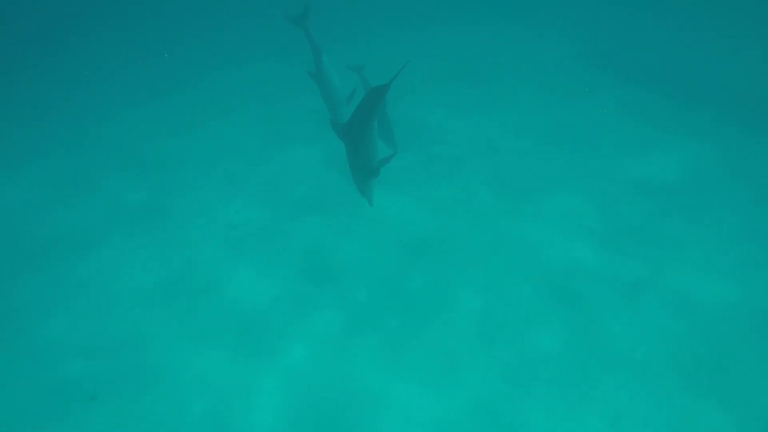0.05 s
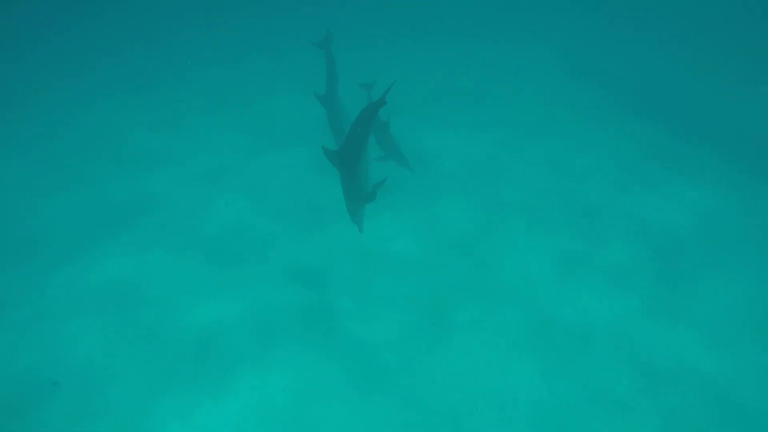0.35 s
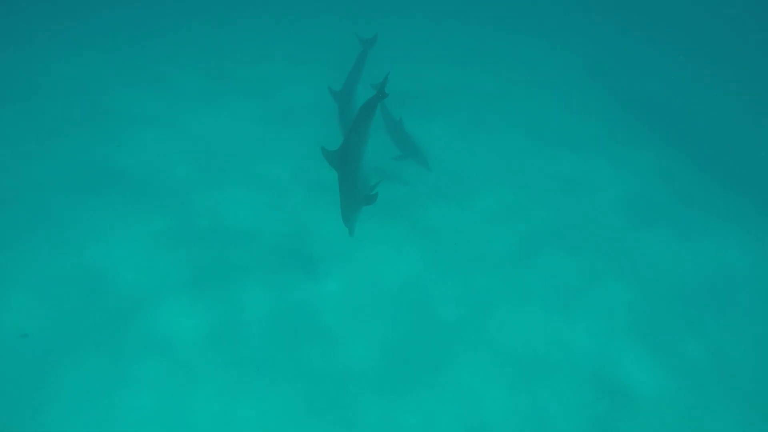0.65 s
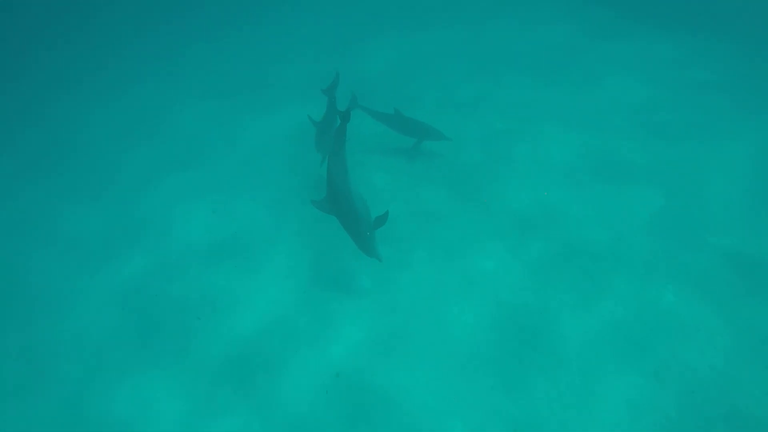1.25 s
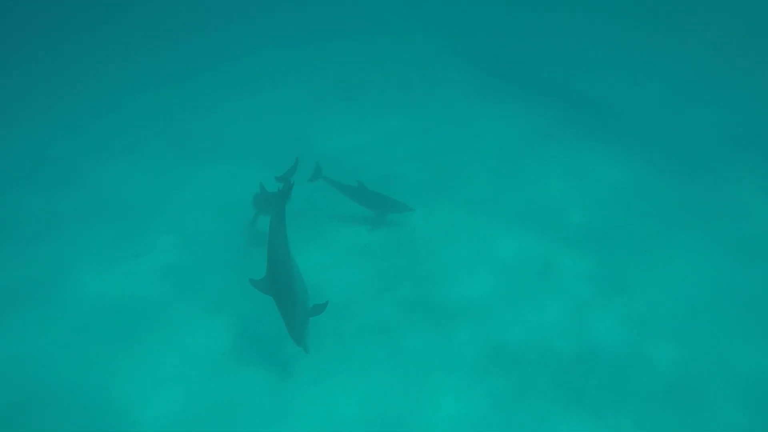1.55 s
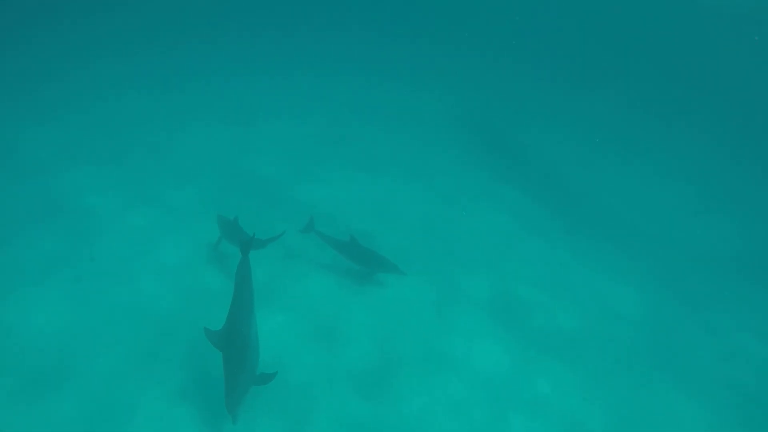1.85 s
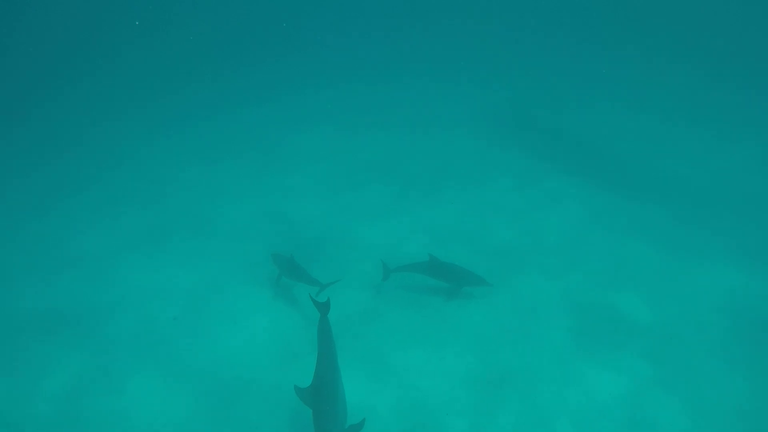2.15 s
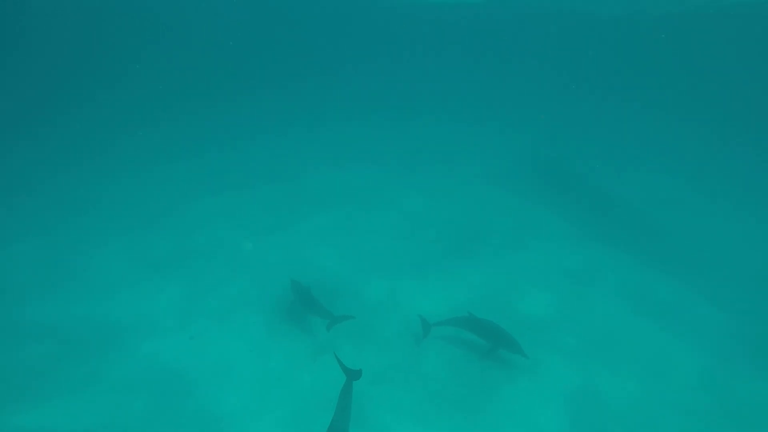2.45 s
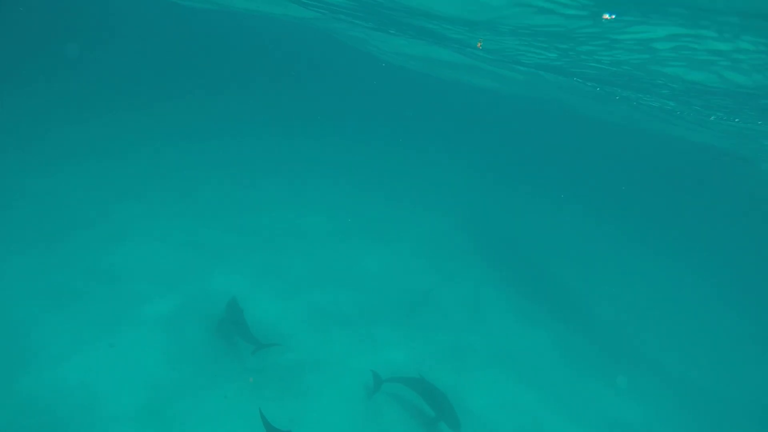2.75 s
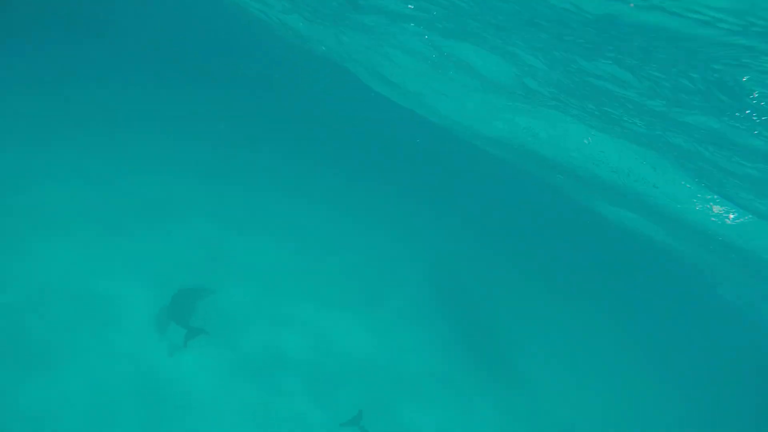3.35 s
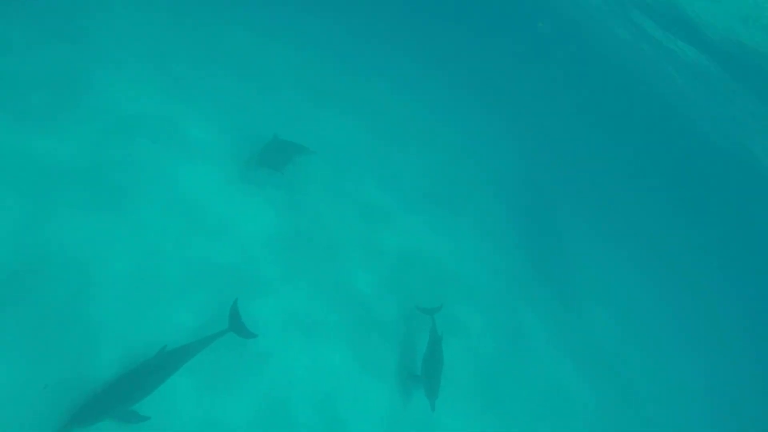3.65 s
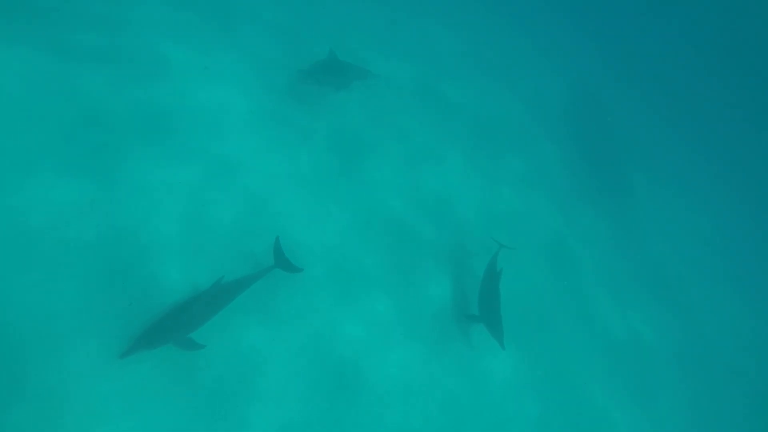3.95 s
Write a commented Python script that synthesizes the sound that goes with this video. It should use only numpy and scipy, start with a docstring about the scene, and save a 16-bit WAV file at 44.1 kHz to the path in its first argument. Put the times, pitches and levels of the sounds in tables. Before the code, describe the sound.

Thin, high dolphin whistles glide down and up over low water rumble, soft fizz and stray bubbles, heard from a submerged case. Late on, a short splash thumps close by, and the whistles continue, briefly quieter.

```python
"""Underwater over a sandy bottom, heard from inside a swimmer's watertight case. Water rumbles, gurgles and
fizzes from the start, and stray bubbles ring. From 0.3 s dolphins whistle, with brief sonar clicks: each
whistle dives, lingers and sweeps up again. At 3.2 s a splash near the surface rings with short tones, overloads
the recorder and ducks its gain, which creeps back under the last two whistles."""
import sys
import numpy as np
from scipy import signal
from scipy.fft import rfft, irfft
from scipy.io import wavfile
from scipy.ndimage import uniform_filter1d

SR = 44100
rng = np.random.default_rng(int(sys.argv[2]) if len(sys.argv) > 2 else 0)


def file_out(sig):
    """Save sig as 16-bit WAV at sys.argv[1]."""
    # one column per channel
    cols = np.atleast_2d(sig).T
    # limit, then scale
    lim = np.clip(cols, -1, 1)
    pcm = np.round(lim * 32767).astype(np.int16)
    wavfile.write(sys.argv[1], SR, pcm)


N = 176400
SAG = .08  # share by which the pitch drops across one throb or squeak


def whistle(contour):
    """A gliding near-sine with a weak octave, hoarse at its low turn, coloured by the case."""
    # How the case passes sound. Each row: frequency in Hz, gain in dB.
    case = [(7200, 4), (8400, -8.5), (9600, 7), (10500, 3.5), (11600, -1), (13300, 2.5), (15500, -14)]
    at, pitch, db = np.transpose(contour)
    t = np.arange(at[0], at[-1], 1 / SR)
    glide = uniform_filter1d(np.interp(t, at, pitch), 300, mode="nearest")
    hoarse = 1 / (1 + (glide / 5500) ** 12)  # nears 1 below 5500 Hz
    waver = drift(hz=120)[:len(t)]
    throb_hz = 110 * (1 + .5 * waver)
    throb = np.cumsum(throb_hz) / SR % 1  # the low turn breaks into sagging pulses
    hz = glide * (1 + (.004 + .03 * hoarse) * waver + SAG * hoarse * (.5 - throb))
    phase = 2 * np.pi * np.cumsum(hz) / SR
    fade_s, mirror_delay_s = .004, .0007
    fades = np.clip(np.minimum(t - t[0], t[-1] - t) / fade_s, 0, 1)
    flutter_db = 3.3 * drift(hz=55)[:len(t)]
    rasp = 1 + .65 * hoarse * drift(hz=500)[:len(t)]
    pulsing = 1 - .5 * hoarse * np.cos(2 * np.pi * throb)
    envelope = amp(np.interp(t, at, db) + flutter_db) * fades * rasp * pulsing
    # The surface returns an inverted copy, so a sweep swells and fades.
    mirror = -amp(-8) * np.sin(phase - 2 * np.pi * hz * mirror_delay_s)
    fundamental = amp(spectrum_at(case, hz)) * (np.sin(phase) + mirror)
    octave_gain = amp(-13 + spectrum_at(case, 2 * hz)) * (1 - .5 * hoarse) * (2 * hz < 15600)
    sub_octave = amp(-12) * hoarse * np.sin(phase / 2)
    return envelope * (fundamental + octave_gain * np.sin(2 * phase) + sub_octave)


def squeak(length, hz, db):
    """A tiny sagging chirp where a whistle cracks at its low turn."""
    progress = np.linspace(0, 1, round(length * SR))
    phase = 2 * np.pi * np.cumsum(hz * (1 + SAG * (.5 - progress))) / SR
    return amp(db) * np.sin(np.pi * progress) ** 2 * np.sin(phase)


def sonar():
    """Echolocation: short runs of bright, sharply damped clicks."""
    # Each row: start in seconds, length in seconds, clicks per second, level in dB.
    trains = [(.345, .04, 45, -38), (2.49, .02, 70, -39), (1.925, .15, 36, -43), (3.014, .005, 40, -40),
              (3.168, .02, 85, -33)]
    click_hz, decay_s = 10500, .00012
    t = np.arange(128) / SR
    click = np.exp(-t / decay_s) * np.sin(2 * np.pi * click_hz * t)
    out = np.zeros(N)
    for start, length, rate, db in trains:
        for s in np.arange(start, start + length, 1 / rate):
            add(out, s, amp(db) * click)
    return out


def dolphins():
    """Whistles, squeaks and clicks, with a short tail scattered from surface and sand."""
    # One contour per whistle. Each point: time in seconds, pitch in Hz, level in dB before the case.
    contours = [
        [(.32, 5300, -70), (.375, 5090, -63), (.41, 5300, -67), (.47, 7700, -59), (.53, 9650, -61.5),
         (.61, 12200, -64), (.668, 14600, -67)],
        [(.772, 14200, -60), (.807, 9200, -57), (.813, 7900, -71), (.828, 4650, -69), (.868, 5500, -63),
         (.897, 7170, -54), (.96, 9570, -50), (1.035, 12150, -57.5), (1.095, 15000, -62)],
        [(1.203, 14300, -55), (1.247, 7300, -63), (1.265, 5450, -48.5), (1.288, 5900, -56),
         (1.305, 5650, -51.5), (1.328, 7100, -52.5), (1.385, 9660, -50.5), (1.425, 11600, -59),
         (1.48, 15400, -60)],
        [(1.66, 15250, -59), (1.706, 6600, -57), (1.716, 4900, -74), (1.748, 4600, -62), (1.762, 5250, -52),
         (1.782, 6550, -51.5), (1.86, 9970, -47.5), (1.93, 13000, -59), (1.972, 15400, -55)],
        [(2.103, 15300, -59), (2.145, 7800, -53), (2.16, 4000, -87), (2.2, 4000, -51.5), (2.228, 6850, -50.5),
         (2.27, 9000, -48), (2.335, 11550, -58), (2.403, 15200, -53)],
        [(3.015, 3750, -62), (3.045, 3250, -48), (3.066, 3710, -47.5), (3.1, 5700, -52.5), (3.14, 7400, -47.5),
         (3.168, 9100, -46), (3.205, 10450, -59), (3.305, 15200, -46)],
        [(3.43, 14900, -60), (3.47, 9100, -63), (3.48, 5100, -89), (3.512, 5100, -62), (3.535, 5300, -60),
         (3.56, 7050, -52), (3.62, 9800, -56), (3.71, 13950, -61), (3.768, 15400, -52)],
        [(3.863, 15300, -52), (3.896, 8200, -60), (3.903, 4300, -88), (3.95, 4300, -66), (3.961, 4700, -52),
         (4.0, 7500, -49.5)],
    ]
    # Each row: start in seconds, length in seconds, pitch in Hz, peak in dB.
    squeaks = [(3.033, .022, 2550, -44), (3.0685, .007, 3850, -32), (3.9, .013, 4350, -42)]
    calls = sonar()
    for contour in contours:
        add(calls, contour[0][0], whistle(contour))
    for start, *chirp in squeaks:
        add(calls, start, squeak(*chirp))
    scatter_db, t60 = -23, .1
    t = np.arange(SR // 4) / SR
    tail = rng.standard_normal(len(t)) * amp(-60 * t / t60)
    return calls + amp(scatter_db) * signal.fftconvolve(calls, tail / np.linalg.norm(tail))[:N]


def splash():
    """The splash snaps with ticks, each setting off a short ringing tone."""
    # Each row: start in seconds, pitch in Hz, peak in dB, 60 dB decay and attack in seconds.
    splash_rings = [ (3.2139, 1850, 11, 0.016, 0.00017), (3.2154, 1620, -9, 0.045, 0.00023),
                    (3.2353, 4900, -7, .006, 0.00025), (3.2352, 2150, -12, 0.014, 0.00025),
                    (3.2623, 600, -7.5, 0.046, 0.00036), (3.269, 1480, 3, 0.034, 0.00018),
                    (3.273, 990, 11, 0.025, 0.00063), (3.277, 720, 0, 0.034, 0.00066),
                    (3.288, 2375, -16.5, 0.032, 0.00044), (3.3105, 3720, 1, 0.0063, 0.00027),
                    (3.3096, 1700, -6, 0.007, 0.00025), (3.313, 490, -15.5, .16, 0.0017),
                    (3.352, 2210, -24.5, 0.024, 0.00032), (3.3507, 2800, -25, 0.013, 0.00036),
                    (3.3948, 1170, -28, 0.06, 0.00041)]
    tick_decay_s, tick_top_hz = .0016, 3300
    lowpass = signal.butter(2, tick_top_hz, fs=SR)
    t = np.arange(SR // 10) / SR
    out = np.zeros(N)
    for start, hz, db, t60, attack in splash_rings:
        tick = signal.lfilter(*lowpass, rng.standard_normal(len(t)) * np.exp(-t / tick_decay_s))
        add(out, start, bubble(hz, db, t60, attack, bend=.16))
        add(out, start, amp(db - 11) * tick)
    return out


def slaps():
    """Water slaps the case in one-sided pressure pulses, rolled off below 24 Hz."""
    # Each row: start in seconds, rise time in seconds, peak in dB before the roll-off.
    hits = [(2.154, 0.0014, -13.5), (3.2135, .0004, 1.5), (3.217, .005, 6.5), (3.275, 0.0019, 5.5),
            (3.82, .006, -24)]
    t = np.arange(SR // 10) / SR
    pressure = np.zeros(N)
    for start, rise, db in hits:
        add(pressure, start, -amp(db) * (t / rise * np.exp(1 - t / rise)) ** 2)
    return signal.lfilter(*signal.butter(2, 24, "high", fs=SR), pressure)


def bubble(hz, db, t60, attack, bend=0):
    """A pocket of air rings and dies away, creeping up in pitch; a bend starts it sharp."""
    rise_per_s, settle_s = 1.7, .007
    t = np.arange(0, 1.3 * t60 + attack, 1 / SR)
    pitch = hz * (1 + rise_per_s * t + bend * np.exp(-t / settle_s))
    envelope = np.minimum(t / attack, 1) * amp(db - 60 * np.maximum(t - attack, 0) / t60)
    return envelope * np.sin(2 * np.pi * np.cumsum(pitch) / SR)


def stray_bubbles():
    """Small bubbles plink and larger pockets of air glug by the case."""
    # Each row of both: start in seconds, pitch in Hz, peak in dB, 60 dB decay and attack in seconds.
    plinks = [ (0.0663, 2900, -23, 0.019, .0002), (0.065, 3840, -18.5, 0.0095, 0.00047),
              (1.427, 1600, -32, 0.039, .002), (1.428, 3490, -34, .03, 0.0012),
              (2.539, 1407, -26, 0.045, 0.00046), (2.72, 930, -39, 0.06, 0.002),
              (3.526, 592, -29, 0.075, 0.0006), (3.5533, 2074, -31, 0.027, .0002),
              (3.558, 600, -23.5, 0.021, .0006)]
    glugs = [ (0.041, 232, -21.5, .06, 0.0048), (.388, 591, -21.5, 0.061, 0.00071),
             (.452, 533, -17.5, 0.031, 0.005), (.458, 537, -9, 0.033, 0.004),
             (0.568, 383, -16, 0.0075, 0.0014), (1.4505, 583, -15.5, 0.072, 0.0027),
             (1.577, 390, -28.5, 0.075, 0.0066), (1.69, 618, -29, 0.066, 0.0034),
             (2.086, 688, -23.5, 0.041, 0.0059), (2.143, 603, -15, 0.033, 0.0029),
             (2.154, 560.6, -13.5, 0.04, 0.003), (2.176, 557, -27.5, 0.16, 0.0045),
             (2.609, 566, -23, 0.085, 0.0041), (2.652, 582, -28, 0.18, 0.00074)]
    out = np.zeros(N)
    for start, *ring in plinks + glugs:
        add(out, start, bubble(*ring))
    return out


def swarm(low_hz, high_hz, per_s, cycles, spread_db, pitches=24):
    """A cloud of bubbles of random strength, each falling 20 dB in the given cycles; rms 1."""
    out = np.zeros(N)
    for hz in np.geomspace(low_hz, high_hz, pitches):
        chance, strength = rng.random(N), rng.exponential(1, N)
        ring = bubble(hz, db=0, t60=3 * cycles / hz, attack=1 / hz)
        for i in np.flatnonzero(chance < per_s / pitches / SR):
            add(out, i / SR, amp(spread_db * min(strength[i], 3)) * ring)
    return unit(out)


def rumble(noise):
    """Flow rumbles on the case in slow swells."""
    # Each row: frequency in Hz, relative level in dB.
    tone = [(10, -4.5), (30, 6.5), (50, -0.5), (100, -9.5), (200, -17), (350, -34.5), (700, -59)]
    # Each row: time in seconds, level in dB.
    fader = [(0, -29), (.55, -30.5), (.9, -33.5), (1.3, -38.5), (1.6, -33), (1.85, -31.5), (2.2, -31),
             (2.45, -36), (2.63, -34.5), (2.9, -41.5), (3.17, -39.5), (3.4, -35.5), (3.72, -39.5),
             (3.83, -37), (4, -39)]
    return coloured(noise, tone) * level(fader)


def gurgle(noise):
    """Stirred air gurgles: low bubbles over a bed of noise."""
    # Each row: frequency in Hz, relative level in dB.
    tone = [(120, -26), (230, -11.5), (380, -5), (520, 0.5), (640, 1), (760, -5), (950, -11), (1500, -42)]
    # Each row: time in seconds, level in dB.
    fader = [(0, -30.5), (.2, -44.5), (.33, -45.5), (.42, -31), (.6, -37), (.8, -42.5), (1.1, -39.5),
             (1.35, -42.5), (1.52, -35), (1.75, -45), (2.0, -46.5), (2.13, -33), (2.35, -43), (2.6, -39.5),
             (2.85, -58.5), (3.42, -61), (3.62, -53), (4, -47.5)]
    churn = swarm(200, 900, per_s=240, cycles=9.2, spread_db=3) + amp(-5.5) * coloured(noise, tone)
    return coloured(churn, tone) * level(fader)


def fizz(noise):
    """Finer stirred air fizzes: tiny bubbles over flickering noise."""
    # Each row: frequency in Hz, relative level in dB.
    tone = [(700, -19.5), (1000, -11.5), (1400, 5), (2000, 1.5), (2700, -2), (3100, -18.5), (3700, 0.5),
            (5000, -17.5), (8000, -27)]
    # Each row: time in seconds, gain in dB.
    fader = [(0, -46), (.3, -55.5), (.44, -44), (.7, -51), (1.25, -53.5), (1.45, -46.5), (1.7, -56),
             (2.0, -55), (2.12, -44.5), (2.35, -53), (2.54, -46), (2.74, -58), (2.88, -69), (3.15, -55),
             (3.4, -65.5), (4, -58.5)]
    fine = coloured(swarm(1000, 5000, per_s=380, cycles=6.5, spread_db=4.2), tone)
    flicker = coloured(noise, tone) * amp(1.9 * drift(hz=43))
    return amp(-2.5) * (fine + flicker) * level(fader)


def drone(noise):
    """A faint, steady drone: a narrow band of noise at 135 Hz."""
    return amp(-51) * coloured(noise, [(80, -25.5), (135, 13), (210, -44.5)])


def hiss(noise):
    """A thin hiss with a faint crackle of the tiniest bubbles."""
    # Each row: frequency in Hz, relative level in dB.
    tone = [(300, 6.5), (2000, 0), (3100, 1), (3800, 6), (4700, -6.5), (5400, -3), (6300, -16),
            (10000, -27.5), (14000, -22), (15500, -28)]
    # Each row: time in seconds, level in dB.
    fader = [(0, -49), (.55, -50.5), (1, -54), (2.55, -52.5), (2.9, -59), (3.15, -52), (3.35, -63),
             (3.65, -58), (4, -60)]
    crackle = swarm(4000, 12000, per_s=60, cycles=.85, spread_db=3)
    return (coloured(noise, tone) + amp(-21) * crackle) * level(fader)


def amp(db):
    """Decibels to gain."""
    return 10 ** (np.asarray(db) / 20)


def unit(x):
    """Scales to rms 1."""
    return x / np.sqrt(np.mean(x ** 2) + 1e-20)


def spectrum_at(points, hz):
    """Reads an EQ curve in dB on a log-frequency axis."""
    freqs, db = np.transpose(points)
    return np.interp(np.log(hz + 1), np.log(freqs + 1), db)


def level(points):
    """Gain at every sample from a fader curve."""
    return amp(np.interp(np.arange(N) / SR, *np.transpose(points)))


def add(mix, start, sound):
    """Mixes a sound in at a start time in seconds."""
    part = mix[max(round(start * SR), 0):][:len(sound)]
    part += sound[:len(part)]


def coloured(x, points):
    """Shapes a sound with an EQ curve, at rms 1."""
    gain = amp(spectrum_at(points, np.fft.rfftfreq(N, 1 / SR)))
    return unit(irfft(rfft(x) * gain, N))


def drift(hz):
    """Smooth random movement up to a rate, at rms 1."""
    rolloff = 1 + (np.fft.rfftfreq(N, 1 / SR) / hz) ** 4
    return unit(irfft(rfft(rng.standard_normal(N)) / rolloff, N))


def scene():
    """Dolphins, splash and bubbles over the bed of moving water, in mono."""
    mix = dolphins() + splash() + slaps() + stray_bubbles()
    for layer, noise in zip((rumble, gurgle, fizz, hiss, drone), rng.standard_normal((5, N))):
        mix += layer(noise)
    return mix[None]


def record(dry):
    """Gain control ducks on the splash and recovers slowly; peaks clip softly; the top end is cut."""
    threshold_db, duck_share, attack_s, release_db_per_s = -5.5, .85, .002, 18
    cutoff_hz = 15600
    power = signal.lfilter(np.ones(128) / 128, 1, dry[0] ** 2)
    power_db = 10 * np.log10(abs(power) + 1e-12)
    release_db = np.arange(N) * release_db_per_s / SR
    held_db = np.maximum.accumulate(power_db + release_db) - release_db
    over_db = np.maximum(held_db - threshold_db, 0)
    pole = np.exp(-1 / (attack_s * SR))
    ducked = dry * amp(-duck_share * signal.lfilter([1 - pole], [1, -pole], over_db))
    clipped = ducked / (1 + ducked ** 8) ** (1 / 8)
    lowpass = signal.firwin(401, cutoff_hz, window=("kaiser", 9), fs=SR)
    return signal.oaconvolve(clipped, lowpass[None], "same")


dry = scene()
out = record(dry)
file_out(out)
```